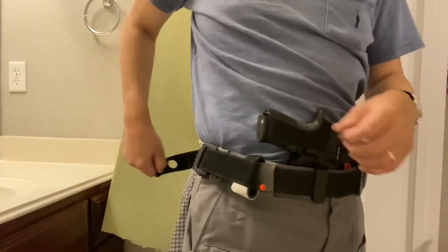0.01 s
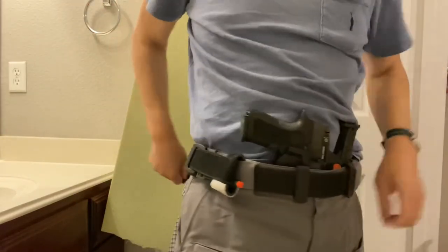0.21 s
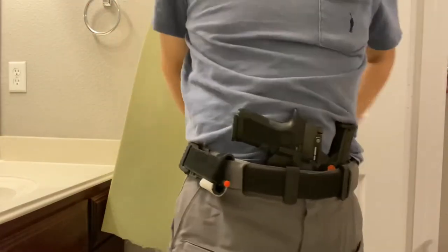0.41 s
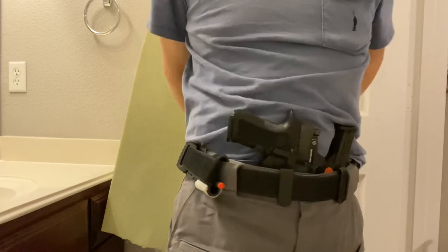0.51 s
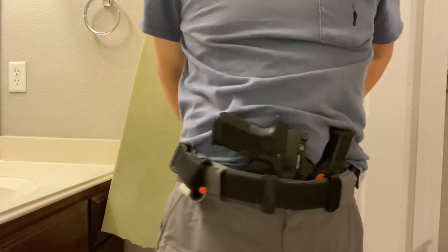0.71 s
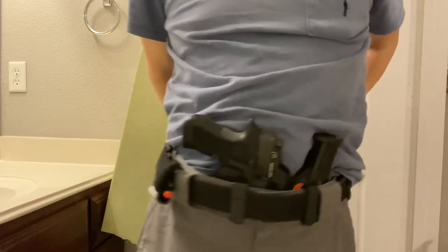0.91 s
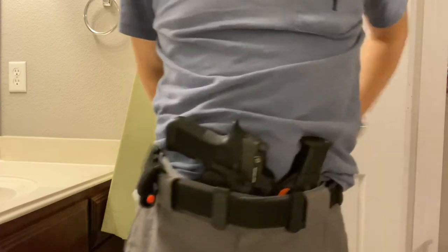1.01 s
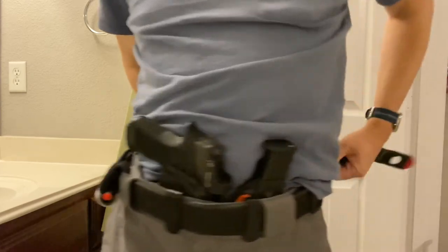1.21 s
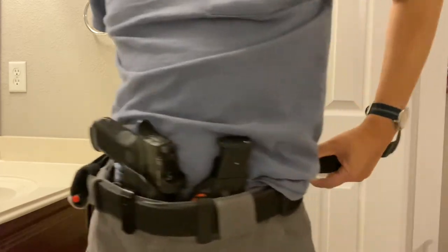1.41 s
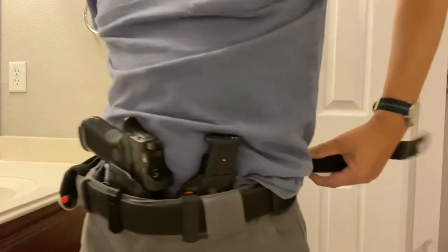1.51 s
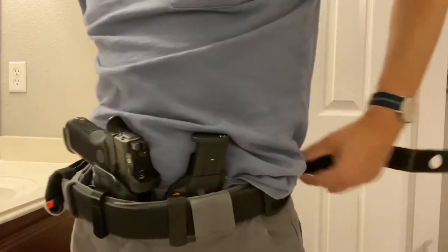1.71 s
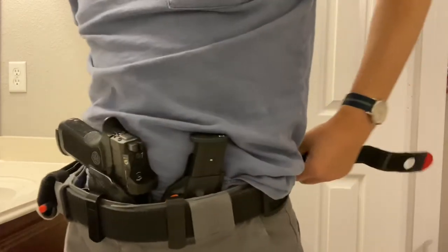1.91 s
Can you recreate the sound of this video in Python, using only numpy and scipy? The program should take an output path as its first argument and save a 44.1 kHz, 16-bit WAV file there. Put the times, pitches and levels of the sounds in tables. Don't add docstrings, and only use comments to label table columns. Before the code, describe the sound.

Hook-and-loop belt lining is ripped open close by in a small, hard-walled bathroom. Light ticks start at 0.12 s, then a loud, bright, crackling tear runs from 0.2 to 0.39 s, with dull flaps of the belt end. Cloth rustles softly until a weaker, steadier rip at 0.85-1.03 s. Quiet rustling and tiny ticks continue to 2 s over faint fan hum; short echoes follow each rip.

```python
import sys
import numpy as np
from scipy import signal
from scipy.fft import rfft, irfft
from scipy.io import wavfile
from scipy.ndimage import uniform_filter1d

SR = 44100
rng = np.random.default_rng(int(sys.argv[2]) if len(sys.argv) > 2 else 0)


def store_pcm(level_fs):
    pcm = np.round(np.clip(level_fs, -1, 1) * 32767).astype(np.int16)
    wavfile.write(sys.argv[1], SR, np.atleast_2d(pcm).T)


def attenuation_scalar(level_db):
    decades = np.asarray(level_db, float) / 20
    return 10 ** decades


N = 88200


def rms_one(x):
    return x / np.sqrt(np.mean(x ** 2) + 1e-20)


def in_time(rows):
    return np.interp(np.arange(N) / SR, *np.transpose(rows))


def at_hz(points, hz):
    table_hz, values = np.array(points).T
    return np.interp(np.log(hz), np.log(table_hz), values)


def drift(rate_hz):
    r = np.exp(-2 * np.pi * rate_hz / SR)
    wander = signal.lfilter([1], [1, -2 * r, r * r], rng.standard_normal(N + SR))
    return rms_one(wander[SR:])


def ring(clicks, hz, cycles):
    r = attenuation_scalar(-60 * hz / (cycles * SR))
    w = 2 * np.pi * hz / SR
    return signal.lfilter([np.sin(w)], [1, -2 * r * np.cos(w), r * r], clicks + 1e-18)


def colour(x, points):
    hz = np.maximum(np.fft.rfftfreq(x.shape[-1], 1 / SR), 1)
    return irfft(rfft(x) * attenuation_scalar(at_hz(points, hz)), x.shape[-1])


def grains(per_s, spread_db, clump_db, clumps_per_s, cycles, spectrum, patch_db):
    clump = clump_db * drift(clumps_per_s)
    strength_db = spread_db * np.minimum(rng.exponential(1, N), 5) + clump
    sizes = attenuation_scalar(strength_db) * rng.choice([-1, 1], N)
    born = sizes * (rng.random(N) < per_s / SR)
    pitches = np.geomspace(150, 14000, 30)
    dealt = rng.integers(0, 30, N)
    total = 0
    for k, hz in enumerate(pitches):
        ringing = np.diff(ring(born * (dealt == k), hz, cycles), prepend=0)
        level = attenuation_scalar(at_hz(spectrum, hz) + patch_db * drift(4.2))
        total = total + level * hz * ringing / np.sin(np.pi * hz / SR)
    return rms_one(total)


# pitch_hz, level_db (per Hz)
AIR_COLOUR = [(25, -5), (70, 2.5), (125, -6), (230, -10.5), (375, -20), (450, -32.5), (2000, -32),
              (9000, -43.5)]


def background():
    air_db, air_alike = -65.5, .7
    hum_hz, hum_db, hum_wobble_db = 181.3, -68.5, 1
    mid, side = rng.standard_normal((2, N))
    both = np.sqrt(1 + air_alike) * mid + np.sqrt(1 - air_alike) * side * [[1], [-1]]
    air = rms_one(colour(both, AIR_COLOUR))
    phase = 2 * np.pi * hum_hz * np.arange(N) / SR + 0.15 * drift(12)
    hum = np.sqrt(2) * attenuation_scalar(hum_db + hum_wobble_db * drift(20)) * np.sin(phase)
    return attenuation_scalar(air_db) * air + hum * attenuation_scalar([[1.5], [-1.5]])


# time_s, level_db
SLIDE_EFFORT = [(0, -105), (.1, -73.5), (.138, -50), (.15, -50), (.55, -63), (.72, -62), (.82, -64),
                (1.18, -60.5), (1.21, -67.5), (1.28, -65.5), (1.45, -64), (1.51, -60.5), (1.62, -67),
                (1.77, -70.5), (1.81, -86), (1.9, -67.5), (1.925, -68.5), (2, -73)]
# pitch_hz, level_db (per Hz)
CLOTH_COLOUR = [(200, -29), (600, 8), (1300, 1.5), (2700, 9), (4200, -3.5), (6000, 15.5), (9000, -87),
                (14000, -40.5)]


def rustle():
    fibres = grains(per_s=15000, spread_db=4.5, clump_db=2, clumps_per_s=51, cycles=4.0,
                    spectrum=CLOTH_COLOUR, patch_db=1.8)
    return attenuation_scalar(in_time(SLIDE_EFFORT)) * fibres


# start_s, peak_db, ring_hz
LONE_TICKS = [(.1162, -46, 3500), (.1201, -38, 6500), (.1248, -34, 2600), (.1289, -39, 6200),
              (.1415, -23, 5500), (.1425, -30, 1800), (.1455, -37.5, 6840), (.147, -26, 5940),
              (.188, -31, 2800), (.192, -23.5, 6000), (.197, -16, 5870), (.854, -38, 5000),
              (1.228, -36.5, 3040), (1.233, -53.5, 3000), (1.309, -57, 5900), (1.505, -60, 4450),
              (1.925, -43.5, 2950)]
# start_s, peak_db, ring_hz
STRONG_SNAPS = [(.2135, -18, 6200), (.2145, -22, 2300), (.2215, -21, 2300), (.2365, -21, 2400),
                (.2291, -17, 6500), (.2328, -13, 7200), (.2352, -14, 6800), (.239, -12, 6400),
                (.245, -17, 6000), (.2535, -14, 6200), (.2555, -13, 6000), (.26, -12, 5800),
                (.2645, -15, 6200), (.2672, -10, 7000), (.2713, -9, 6000), (.279, -14, 5800),
                (.2815, -14, 6000), (.287, -14, 5900), (.297, -16, 6200), (.316, -21, 2900),
                (.371, -17, 5900), (.3817, -15, 5900), (.8865, -24, 4900), (.9147, -23, 5200),
                (1.0055, -21, 5000), (1.015, -19, 3400)]


def snaps(rows, cycles):
    spread_s, trim_db, length = .0016, 4, 800
    out = np.zeros(N + length)
    chance = rng.random((len(rows), 6))
    for (start_s, peak_db, hz), c in zip(rows, chance):
        clicks = np.zeros(length)
        clicks[0] = 1
        later = (c * spread_s * SR).astype(int)
        np.add.at(clicks, later, (1 - c / 2) * np.array([-1, 1, -1, 1, -1, 1]))
        burst = np.diff(ring(clicks, hz, cycles), prepend=0)
        i = int(start_s * SR)
        out[i:i + length] += attenuation_scalar(peak_db + trim_db) * burst / np.abs(burst).max()
    return out[:N]


# start_s (peak of the puff), level_db, length_s,
# pitch_hz
BELT_FLAPS = [(0.151, -61, 0.016, 330), (0.217, -41.5, 0.017, 390), (0.247, -44, 0.0098, 344),
              (0.301, -45, 0.021, 127), (0.414, -41.5, 0.0099, 296), (0.441, -47, 0.015, 40.3),
              (0.68, -67, 0.029, 430), (0.974, -45, 0.011, 355), (1.087, -59.5, 0.0079, 81),
              (1.212, -52.5, 0.0066, 2820), (1.47, -72.5, 0.034, 393), (1.643, -62.5, 0.011, 1580),
              (1.747, -61, 0.0052, 2480), (1.909, -60, 0.0094, 2420)]


def flaps():
    width = 1.61
    t = np.arange(N) / SR
    out = 0
    for start_s, level_db, length_s, hz in BELT_FLAPS:
        age = np.clip((t - start_s) / length_s + 1, 0, None)
        band = signal.butter(2, [hz / width, hz * width], "band", fs=SR, output="sos")
        noise = rms_one(signal.sosfilt(band, rng.standard_normal(N)))
        out = out + attenuation_scalar(level_db) * age * np.exp(1 - age) * noise
    return out


# time_s, level_db
FIRST_PULL = [
    (.18, -67.5),
    (.195, -36),
    (.21, -33),
    (.216, -20.5),
    (.248, -37.5),
    (.27, -24.5),
    (.31, -31.5),
    (.385, -31.5),
    (.395, -97),
]
# time_s, level_db
SECOND_PULL = [
    (.83, -84),
    (.852, -36),
    (.856, -41.5),
    (.885, -39),
    (.93, -35),
    (.97, -34.5),
    (1.015, -34),
    (1.025, -44.5),
    (1.035, -74),
]
# pitch_hz, level_db (per Hz)
FIRST_WEBBING = [(150, -29.5), (600, -19.5), (1100, -19), (2300, -12.5), (4000, -17), (6200, -6),
                 (9000, -30.5), (14000, -34)]
# pitch_hz, level_db (per Hz)
SECOND_WEBBING = [(150, -8), (500, -16), (1300, -8.5), (2700, -3), (4000, -7.5), (5500, -1), (9000, -24.5),
                  (14000, -28)]


def rip(pull, webbing):
    t = np.arange(N) / SR
    on = (t > pull[0][0]) & (t < pull[-1][0])
    hooks = grains(per_s=5000, spread_db=1.5, clump_db=1.5, clumps_per_s=395, cycles=11.4,
                   spectrum=webbing, patch_db=3.5)
    return on * attenuation_scalar(in_time(pull)) * hooks


def direct(x, db, lead_s, pan_db):
    lag = 2 * np.pi * np.fft.rfftfreq(N, 1 / SR) * lead_s
    right = irfft(rfft(x) * np.exp(-1j * np.minimum(lag, 4 * np.pi)), N)
    return np.array([x, right]) * attenuation_scalar([[db + pan_db / 2], [db - pan_db / 2]])


# pitch_hz, t60_s
ROOM_DECAY = [(150, 0.21), (600, 0.46), (2000, 0.35), (5000, .32), (9000, 0.19), (14000, 0.24)]


def reflections():
    first_echo_s, build_s, shared_below_hz = 0.002, 0.0011, 190
    t = np.arange(SR // 2) / SR
    white = rng.standard_normal((2, 2, len(t)))
    swap = white[:, ::-1] - white
    white += signal.lfilter(*signal.butter(1, shared_below_hz, fs=SR), swap) / 2
    edges = 40 * 2 ** np.arange(0, 9.1)
    tail = 0
    for k, (low, high) in enumerate(zip(edges, edges[1:])):
        band = signal.butter(2, [low, high], "band", fs=SR, output="sos")
        decay = attenuation_scalar(-60 * t / at_hz(ROOM_DECAY, np.sqrt(low * high)))
        tail = tail + signal.sosfilt(band, white[k % 2]) * decay
    tail = tail * (1 - np.exp(-np.clip(t - first_echo_s, 0, None) / build_s))
    return tail / np.sqrt(np.sum(tail ** 2) / 2)


def bathroom(x):
    room_db, moves_per_s = 5.5, 3.0
    turn = 2 * np.pi * moves_per_s * np.arange(N) / SR
    wet = 0
    for share in (np.cos(turn), np.sin(turn)):
        wet = wet + signal.fftconvolve(x[None] * share, reflections(), axes=1)[:, :N]
    return attenuation_scalar(room_db) * wet


# pitch_hz, level_db
LEFT_LEAN = [(60, 0), (200, -1), (600, -2.5), (1500, -.8), (4500, 1.5), (14000, -.3)]


def scene():
    cloth = rustle() + flaps()
    snapping = snaps(LONE_TICKS, cycles=2.5) + snaps(STRONG_SNAPS, cycles=6.0)
    tearing = rip(FIRST_PULL, FIRST_WEBBING) + rip(SECOND_PULL, SECOND_WEBBING)
    heard = direct(tearing + snapping, db=-1, lead_s=0.0003506, pan_db=3.3)
    heard = heard + direct(cloth, db=-3, lead_s=0.00015, pan_db=-1.5)
    heard = heard + bathroom(tearing + snapping / 2 + cloth)
    lean = at_hz(LEFT_LEAN, np.maximum(np.fft.rfftfreq(N, 1 / SR), 1)) / 2
    return irfft(rfft(heard) * attenuation_scalar([lean, -lean]), N) + background()


def roll_off(x):
    return signal.sosfilt(signal.butter(12, 15510, fs=SR, output="sos"), x)


def record(dry):
    body_top_hz, body_fade_hz = 9700, 493
    sheen_low_hz, sheen_top_hz, sheen_fade_hz = 11300, 14600, 463
    sheen_db, gate_db, gate_slope, sheen_width = -7, -66.5, 1.1, .5
    hz, spectrum = np.fft.rfftfreq(N, 1 / SR), rfft(dry)
    body = irfft(spectrum * np.clip((body_top_hz - hz) / body_fade_hz, 0, 1), N)
    inside_hz = np.minimum(hz - sheen_low_hz, sheen_top_hz - hz)
    one, other = irfft(spectrum * np.clip(inside_hz / sheen_fade_hz, 0, 1), N)
    level_db = 10 * np.log10(np.abs(uniform_filter1d(one ** 2, size=1024)) + 1e-14)
    gate = attenuation_scalar(sheen_db + gate_slope * np.minimum(level_db - gate_db, 0))
    sheen = gate * (one + sheen_width * other * [[1], [-1]])
    return roll_off(body + sheen)


dry = scene()
out = record(dry)
store_pcm(out)
```